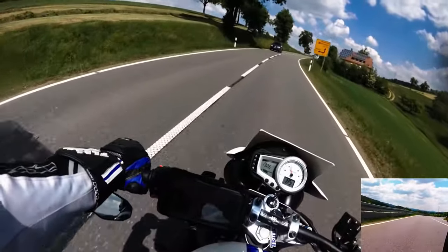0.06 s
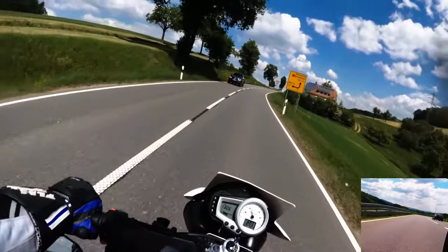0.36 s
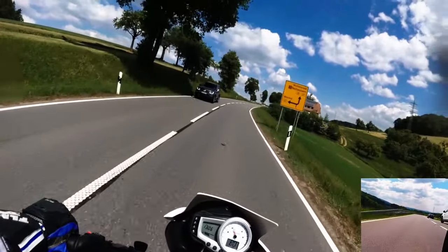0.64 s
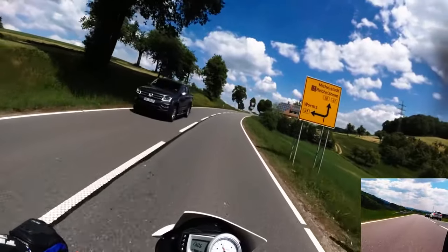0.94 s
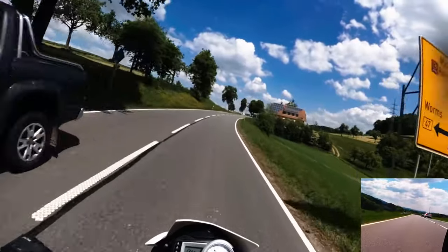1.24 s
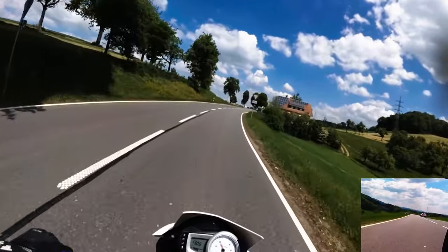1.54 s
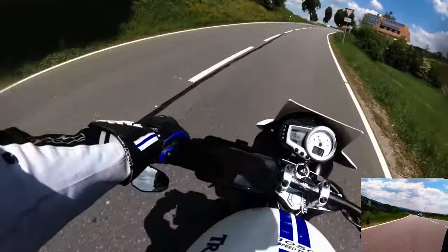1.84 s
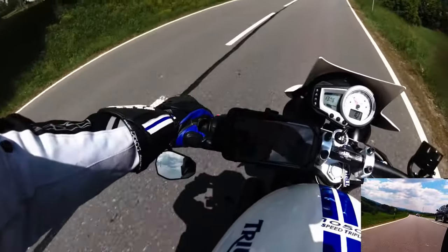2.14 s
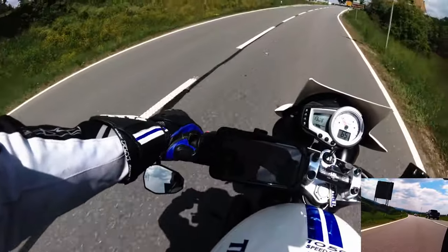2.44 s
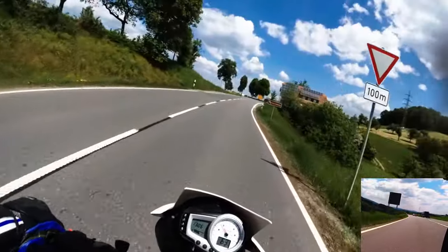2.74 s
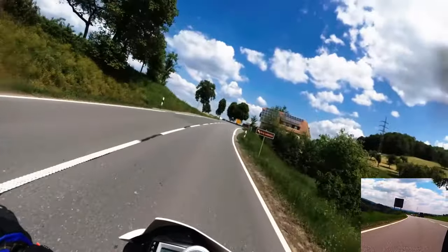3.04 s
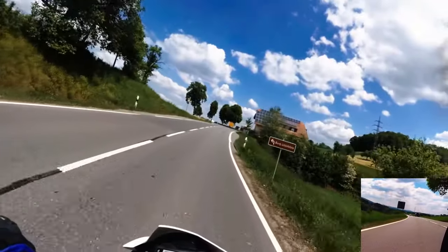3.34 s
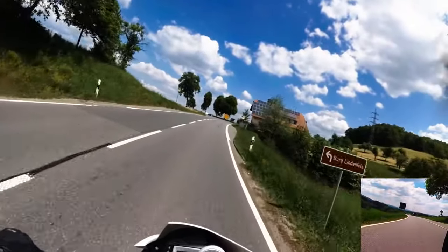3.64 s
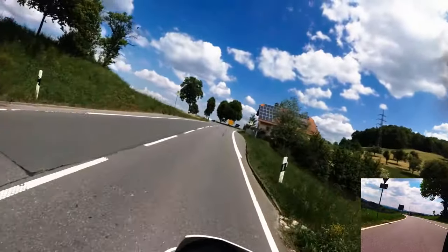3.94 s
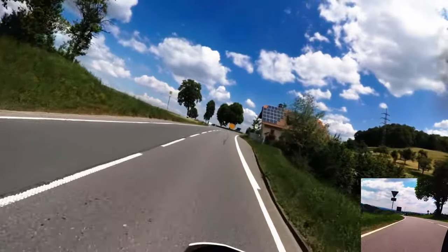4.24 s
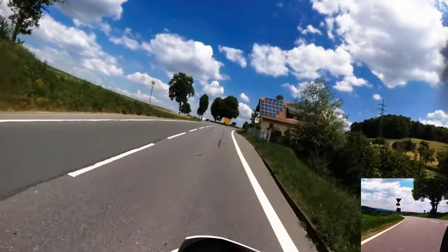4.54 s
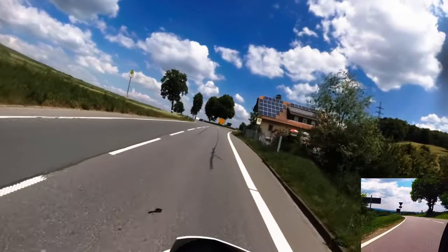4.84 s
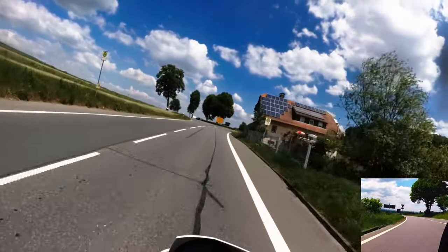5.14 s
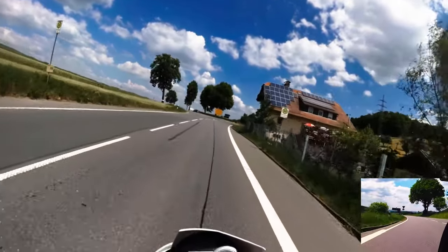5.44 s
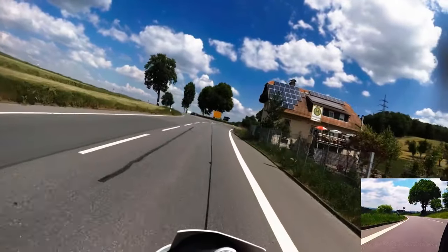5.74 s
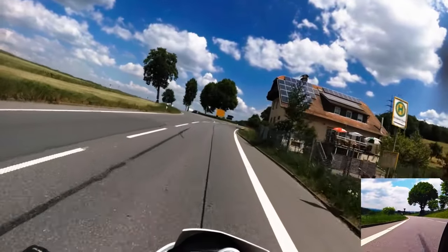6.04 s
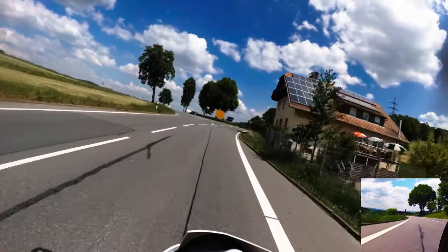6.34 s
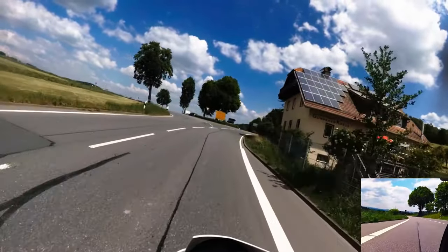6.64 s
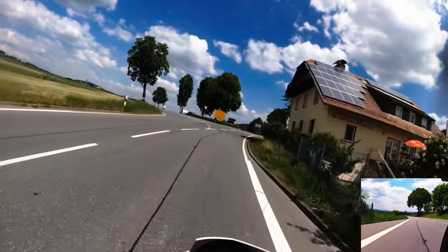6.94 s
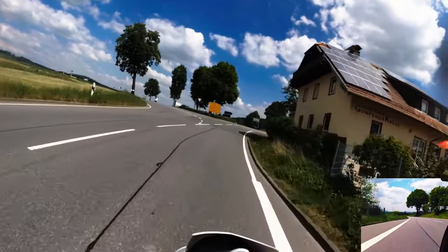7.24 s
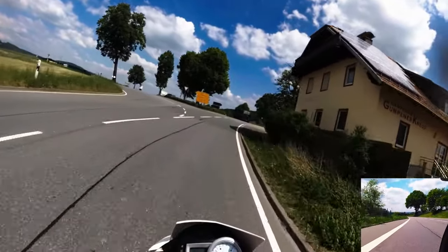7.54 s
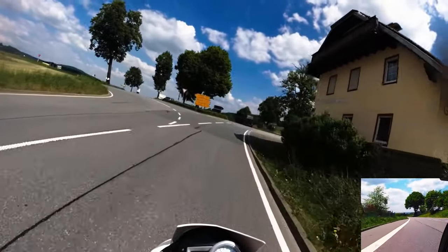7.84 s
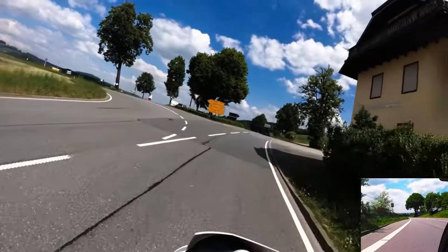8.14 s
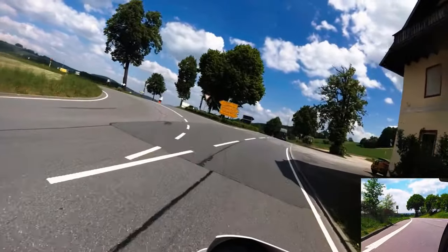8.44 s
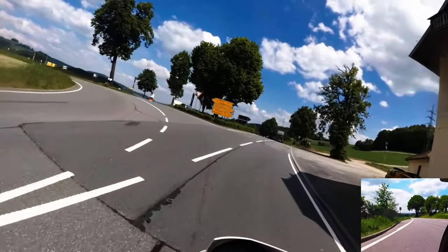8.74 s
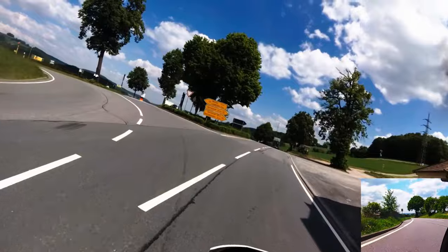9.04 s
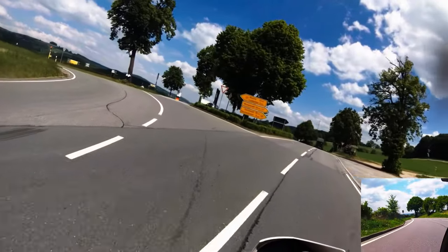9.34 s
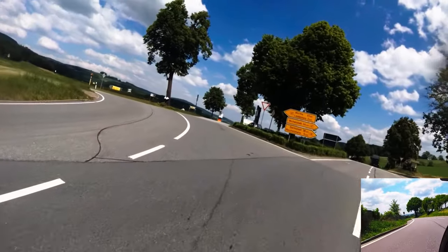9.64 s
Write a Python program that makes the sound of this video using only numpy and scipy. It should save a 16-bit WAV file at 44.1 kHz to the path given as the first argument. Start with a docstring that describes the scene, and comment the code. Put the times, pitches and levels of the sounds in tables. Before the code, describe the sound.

A three-cylinder motorcycle slows on a country road, heard from the rider's helmet with gusty wind rumbling throughout. For the first 3 seconds the engine coasts, its pulsing note sinking along with a gear whine. From about 3.5 to 5.3 seconds it holds a little throttle, and the buffeting eases for a moment. It then coasts again with faint metallic ticking from the drive. Around 6.4 seconds the revs fall away, and at 6.5 a click and a loud, short gearbox knock mark a downshift. The engine idles briefly. Between 7.2 and 7.8 seconds the clutch bites with a soft rush and drags the revs back up. The engine then winds down with a falling gear whine and a light, busy metallic rattle until about 9 seconds, and drops to idle by 9.5.

```python
"""Motorcycle downshift in the wind

A three-cylinder bike on a country road, heard from the rider's helmet through gusty wind. It coasts,
holds a little throttle and coasts again; the clutch is pulled, a lower gear knocks in, and the engine
is dragged back up with whining gears and a rattling drive, then drops to idle. The firings pulse
through the exhaust pipe, make the gears throb and jerk the slack drive."""
import sys
import numpy as np
from scipy import signal
from scipy.fft import rfft, irfft, next_fast_len
from scipy.io import wavfile
from scipy.ndimage import uniform_filter1d, minimum_filter1d, map_coordinates

SR = 44100
rng = np.random.default_rng(int(sys.argv[2]) if len(sys.argv) > 2 else 0)


def generate_wav(signal):
    """Clip the signal to [-1, 1] and save it as 16-bit WAV at the path in sys.argv[1]."""
    frames = np.transpose(np.atleast_2d(signal))
    scaled = np.clip(frames, -1, 1) * 32767
    pcm = np.round(scaled).astype(np.int16)
    wavfile.write(sys.argv[1], SR, pcm)


N = 427325
TIME = np.arange(N) / SR


def amp(db):
    """Decibels to gain."""
    return 10 ** (np.asarray(db) / 20)


def unit(x):
    """Scale to rms 1."""
    return x / np.sqrt(np.mean(x ** 2) + 1e-20)


def curves(rows):
    """One automation curve for each column after the time."""
    times, *columns = np.transpose(rows)
    return [np.interp(TIME, times, column) for column in columns]


def swell(centre_s, half_width_s):
    """A bell-shaped fade in and out."""
    return np.exp(-((TIME - centre_s) / half_width_s) ** 2)


def wobble(rate):
    """Smooth random modulation with `rate` knots a second."""
    knots = rng.standard_normal(int(N * rate / SR) + 4)
    steps = np.arange(0, N * rate / SR + 1, 1 / 8)
    return np.interp(TIME * rate, steps, map_coordinates(knots, [steps]))


def colour(x, points, causal=False):
    """EQ by (Hz, dB) points; a causal filter rings only after each pulse."""
    size = 2 * next_fast_len(N // 2 + 8192)
    hz, db = np.transpose(points)
    gain = amp(np.interp(np.log(np.fft.rfftfreq(size, 1 / SR) + 1), np.log(hz), db))
    if causal:
        cepstrum = irfft(np.log(gain))
        gain = np.exp(rfft(2 * cepstrum[:size // 2], size) - cepstrum[0])
    return irfft(rfft(x, size) * gain, size)[:N]


def noise(points):
    """Coloured noise of rms 1."""
    return unit(colour(rng.standard_normal(N), points))


def resonate(x, hz, width):
    """A resonance applied twice, for steep skirts."""
    b, a = signal.iirpeak(hz, hz / width, SR)
    return signal.lfilter(b, a, signal.lfilter(b, a, x))


def noise_band(hz, width):
    """Resonant noise of rms 1."""
    return unit(resonate(rng.standard_normal(N), hz, width))


def impulses(seconds, sizes):
    """A track with one impulse at each time."""
    return np.bincount(np.clip(np.round(seconds * SR).astype(int), 0, N - 1), sizes, N)


# turbulence on the helmet, with two lulls (time [s], level [dB])
BUFFET_LEVEL = [(0, -19.5), (1, -24), (1.6, -21), (2.6, -23.5), (3.1, -16.5), (3.7, -18.5), (4.05, -33.5),
                (4.8, -35), (5.5, -18.5), (6.4, -18.5), (6.75, -22.5), (7.1, -29.5), (7.5, -22),
                (8.1, -22.5), (9.15, -19), (9.5, -19.5)]
# air streaming past (time [s], relative roar level [dB], unused shell level [dB])
AIRSTREAM = [(0, -22, -47.5), (1.75, -22.5, -39), (2.1, -24, -40.5), (2.6, -26.5, -45), (3.1, -23, -44.5),
             (4.2, -23, -44.5), (5.7, -19.5, -41), (6.4, -29.5, -49), (6.7, -25.5, -42.5),
             (7.4, -24.5, -41), (7.85, -22.5, -37), (8.7, -26, -41), (9.69, -26.5, -47)]
# air at the helmet's edges (time [s], relative level [dB])
HISS_LEVEL = [(0.1, -68), (1.87, -66), (5.68, -63.5), (7.53, -67), (7.64, -60), (7.8, -64), (9.09, -67.5),
              (9.28, -71), (9.6, -69)]
# EQ of the four wind layers, from rumble to sizzle (frequency [Hz], gain [dB])
BUFFET_EQ = [(10, -29), (30, -17.5), (60, -1.5), (110, -3.5), (160, -3.5), (220, -15), (350, -29.5),
             (900, -87)]
ROAR_EQ = [(60, -6), (150, -1), (220, 5), (330, -1), (440, -2.5), (530, -10), (600, -12), (700, -29.5),
           (1200, -38), (5000, -73)]
SHELL_EQ = [(400, 2.5), (650, 1.5), (780, 1), (950, 0), (1080, -5.5), (1250, -17), (2000, -21.5),
            (5000, -47.5)]
HISS_EQ = [(1500, -17), (3000, -9), (4500, 0.5), (6200, 5.5), (7500, 0), (9400, -3.5), (10300, -9),
           (12000, -22), (15500, -36)]


def wind(gust_db=1.1, eddy_db=2, roar_trim_db=-1.7, shell_db=-41, shell_follows=0.37, hiss_trim_db=6):
    """The wind bed: eddies buffet the helmet, roar round it, ring its shell and hiss at its edges."""
    gust = gust_db * wobble(6.5)
    stream_db = curves(AIRSTREAM)[0] + gust
    eddies = unit(wobble(45) + wobble(140))
    buffet = amp(curves(BUFFET_LEVEL)[0] + gust + wobble(9.2)) * noise(BUFFET_EQ)
    roar = amp(stream_db + roar_trim_db + eddy_db * eddies) * noise(ROAR_EQ)
    ring_db = shell_db + shell_follows * (stream_db - stream_db.mean())
    shell = amp(ring_db + eddy_db * unit(eddies + wobble(70))) * noise(SHELL_EQ)
    hiss = amp(curves(HISS_LEVEL)[0] + hiss_trim_db + unit(eddies + wobble(40))) * noise(HISS_EQ)
    return buffet + roar + shell + hiss


# four puffs and two pings (time [s], half-width [s], level [dB], pitch [Hz], filter width [Hz])
PUFFS_AND_PINGS = [(2.33, 0.035, -39.5, 970, 350), (3.793, 0.036, -51, 2900, 2400),
                   (5.895, 0.027, -33, 936, 200), (6.854, 0.005, -38, 1000, 450),
                   (8.566, 0.022, -36.5, 905, 696), (9.491, .008, -41, 1700, 500)]


def puffs_and_pings():
    """Short puffs of air and two brief pings, near 1 kHz and 1.7 kHz."""
    return sum(amp(db) * swell(s, span) * noise_band(hz, width)
               for s, span, db, hz, width in PUFFS_AND_PINGS)


# swells of the panel's ring (time [s], half-width [s], level [dB])
PANEL_SWELLS = [(2.852, 1, -49), (5.888, 0.35, -47), (8.356, 0.47, -47)]


def fairing():
    """Air and vibration set a plastic panel ringing now and then."""
    return sum(amp(db) * swell(s, span) for s, span, db in PANEL_SWELLS) * noise_band(hz=960, width=110)


def clutch(rush_db=-41, ring_db=-47):
    """The slipping clutch rushes as it drags the engine up; a narrow ring swells as it bites."""
    rush = noise([(300, -26), (600, 7), (1000, 4.5), (1300, -16.5), (1700, -7.5), (2300, -18.5),
                  (2900, -13), (4000, -30), (8000, -42.5)])
    ring = noise_band(hz=1630, width=80)
    return amp(rush_db) * swell(7.46, 0.61) * rush + amp(ring_db) * swell(7.63, 0.2) * ring


# body of the gearbox knock (frequency [Hz], relative level [dB], 60 dB decay [s])
KNOCK_MODES = [(454, -1.5, 0.03), (467, -3, 0.035), (337, -25, 0.028), (1750, -22, .02)]
SHIFT_S = 6.534


def downshift(click_db=-41, click_t60_s=0.036, knock_db=-5, lag_s=0.00072, rise_s=0.0034):
    """The shift dogs click, then the gearbox knocks."""
    age = np.maximum(TIME - SHIFT_S, 0)
    snap = noise([(500, -12), (1700, -18), (2700, -18), (4200, 1), (6300, -6), (8000, -10), (12000, -45)])
    click = amp(click_db - 60 * age / click_t60_s) * (age > 0) * snap
    late = np.maximum(age - lag_s, 0)
    knock = sum(amp(db - 60 * late / t60) * np.sin(2 * np.pi * hz * late) for hz, db, t60 in KNOCK_MODES)
    attack = 1 - np.exp(-(late / rise_s) ** 2)
    return click + amp(knock_db) * attack * knock


# spells of engine braking (start [s], end [s], rattle level [dB])
OVERRUN_SPELLS = [(5.502, 6.38, -51), (7.6, 8.85, -47), (8.95, 9.1, -51)]
# the slack drive's hardest ticks (time [s], relative peak [dB], pitch [Hz])
HARD_TICKS = [(5.464, -45, 6400), (5.604, -46, 4450), (5.66, -44, 6300), (5.724, -48, 4350),
              (5.864, -42, 4240), (5.919, -38, 4620), (5.934, -44, 4390), (5.99, -44, 4250),
              (6.033, -39.5, 4070), (6.047, -43, 4350), (6.163, -44, 4350), (6.206, -47, 4120),
              (6.251, -44, 4280), (6.28, -39.5, 4200), (6.341, -41, 4010), (6.373, -45, 6200),
              (6.395, -46, 6400), (7.592, -44, 4080), (7.61, -42, 4150), (7.627, -38, 4300),
              (7.644, -40, 4310), (7.66, -33.5, 4230), (7.675, -38, 4240), (7.704, -42, 4170),
              (7.733, -38, 4060), (7.775, -43, 4110), (7.802, -38, 4420), (7.816, -43, 4250),
              (7.83, -36.5, 4230), (7.844, -43, 6100), (7.858, -42, 4020), (7.871, -44, 4280),
              (7.886, -42, 6100), (7.913, -40, 4080), (7.942, -38.5, 4330), (7.984, -42, 6000),
              (7.998, -38, 4030), (8.012, -41, 4070), (8.026, -44, 4130), (8.054, -34, 4240),
              (8.084, -39, 4200), (8.099, -44, 4040), (8.156, -40, 4030), (8.185, -36, 4280),
              (8.201, -38, 4110), (8.243, -41, 4150), (8.259, -36, 4290), (8.287, -41, 4140),
              (8.303, -41, 6300), (8.363, -38, 4500), (8.378, -35, 4300), (8.408, -41, 4280),
              (8.424, -39, 4320), (8.439, -37, 4300), (8.499, -44, 4210), (8.516, -42, 4360),
              (8.532, -39, 4350), (8.547, -45, 4250), (8.58, -41, 4180), (8.626, -47, 3910),
              (8.655, -42, 3950), (8.688, -46, 4140), (8.708, -44, 4110), (8.772, -43, 4200),
              (8.804, -39, 4130), (8.821, -42, 4030), (8.837, -31.5, 4310), (8.855, -38, 4250),
              (8.991, -36.5, 4300), (9.111, -43, 3730)]
# metallic ring of each tick (frequency [Hz], filter width [Hz], gain [dB])
STEEL_MODES = [(3720, 180, 4), (3975, 310, 5), (4270, 290, 6), (4530, 220, 6), (6190, 820, -1),
               (7800, 2000, -14)]


def rattle(fired, rise_db_per_s=247, fall_db_per_s=73, rebound_s=0.005, rebound_db=-9, tick_trim_db=4,
           contact_s=0.0018, focus_db=7, focus_hz=420):
    """On the overrun the firings jerk the slack drive and it rebounds; each contact scrapes on steel."""
    fired = fired[fired > OVERRUN_SPELLS[0][0]]
    slack = 0
    for start, end, db in OVERRUN_SPELLS:
        fade_in_db = rise_db_per_s * np.maximum(start - fired, 0)
        fade_out_db = fall_db_per_s * np.maximum(fired - end, 0)
        slack += amp(db - fade_in_db - fade_out_db)
    cluster_db = 4.5 * wobble(12)[(fired * SR).astype(int)]
    jerks = slack * amp(cluster_db + rng.standard_normal(len(fired)))
    rebounds = fired + rebound_s * (0.5 + rng.random(len(fired)))
    tick_s, tick_db, tick_hz = np.transpose(HARD_TICKS)
    times = np.concatenate([fired, rebounds, tick_s])[:, None]
    sizes = np.concatenate([jerks, amp(rebound_db) * jerks, amp(tick_db + tick_trim_db)])[:, None]
    pitches = np.concatenate([rng.choice(tick_hz, 2 * len(fired)), tick_hz])[:, None]
    age = np.arange(SR // 50) / SR
    envelope = np.sqrt(age) * np.exp(-age / contact_s)
    rings = 0
    for hz, width, db in STEEL_MODES:
        # a contact favours the modes near its own pitch
        detuning = np.minimum(np.abs(pitches - hz) / focus_hz, 1)
        share = amp(db - focus_db * detuning + 1.5 * rng.standard_normal(times.shape))
        scrapes = envelope * rng.standard_normal((len(times), len(age)))
        rings += share * resonate(scrapes, hz, width)
    rings = sizes * rings / np.abs(rings).max(axis=1, keepdims=True)
    starts = np.round(times * SR) / SR
    return impulses((starts + age).ravel(), rings.ravel())


# high gear, fading as the throttle opens (time [s], level [dB], overtone level [dB])
HIGH_GEAR = [(0, -30, -60), (1.2, -27.5, -56.5), (1.901, -31.5, -50), (2.5, -29.5, -60), (2.9, -34, -65),
             (3.4, -70, -91)]
# low gear, loudest as it drags the engine up (time [s], level [dB], overtone level [dB])
LOW_GEAR = [(6.7, -55, -76), (7.25, -42.5, -55), (7.45, -33.5, -48.5), (7.75, -28.5, -58),
            (8.35, -34.5, -49.5), (8.6, -43, -49), (9.69, -48.5, -70)]


def gear_whine(hz, levels, firings, third_db, throb, waver_db, jitter_rad):
    """The engaged gear pair sings as its teeth mesh; the firings add sidebands."""
    level_db, overtone_db = curves(levels)
    phase = 2 * np.pi * np.cumsum(hz) / SR + jitter_rad * wobble(45)
    overtones = np.sin(2 * phase) + amp(third_db) * np.sin(3 * phase)
    tone = amp(level_db) * np.sin(phase) + amp(overtone_db) * overtones
    pulse = 1 + throb * np.cos(2 * np.pi * firings)
    return np.sqrt(2) * amp(waver_db * wobble(25)) * tone * pulse


# strain on the engine's gears, peaking as the clutch bites (time [s], relative level [dB])
WHIRR_LEVEL = [(0, -52), (1, -59.5), (1.8, -53.5), (4.5, -56), (5.6, -51.5), (6.5, -53.5), (7.2, -50),
               (7.65, -45.5), (7.95, -50), (9.2, -53), (9.69, -50)]
# singing of the meshes, loudest under engine braking (time [s], relative level [dB])
MESH_LEVEL = [(0, -63), (1.2, -61.5), (2.8, -59.5), (3.7, -56.5), (5.3, -55), (6.35, -54), (6.65, -68),
              (7.2, -59), (7.6, -51.5), (8.1, -53), (9.05, -55), (9.35, -53.5), (9.69, -57)]
# the engine's mesh tones (pitch [multiple of the firing rate], relative level [dB])
MESH_TONES = [(22.7, -9), (30.5, 3), (40, 0.5), (60.8, 2)]
# EQ of the valve gear, injectors and casing (frequency [Hz], gain [dB])
WHIRR_EQ = [(600, -23.5), (1200, 5), (1750, 3), (2300, -3.5), (2750, -7.5), (3050, -3.5), (3400, -6),
            (4800, -10), (6000, -21.5), (12000, -56.5)]
INJECTOR_EQ = [(3000, -24.5), (5300, -0.5), (8000, -10.5), (9400, 4), (10500, -1), (11500, -7),
               (13000, -18), (15500, -35.5)]
CASING_EQ = [(500, -30), (1200, -3), (1700, 10), (2200, -6), (2650, 1), (2900, -3), (3100, 0), (3400, 0.5),
             (3800, 0.5), (5000, -17.5), (9000, -37)]


def engine_works(firings, throttle, idling, whirr_trim_db=1, mesh_trim_db=-1.2, injector_db=-68,
                 line_db=-3, waver_db=1.5, throb=0.15):
    """Valve gear whirrs and injectors fizz with the firings; mesh tones sweep the casing's resonances."""
    whirr = amp(curves(WHIRR_LEVEL)[0] + whirr_trim_db) * noise(WHIRR_EQ)
    injectors = amp(injector_db) * (throttle + idling) * noise(INJECTOR_EQ)
    mesh = 0
    for multiple, db in MESH_TONES:  # each a thin line in a fuzzy halo
        halo = np.sin(2 * np.pi * (multiple * firings + 0.35 * wobble(200)))
        line = np.sin(2 * np.pi * (multiple * firings + 0.2 * wobble(25)))
        mesh += amp(db + waver_db * wobble(10)) * (halo + amp(line_db) * line)
    singing = amp(curves(MESH_LEVEL)[0] + mesh_trim_db) * unit(colour(mesh, CASING_EQ))
    pulse = 1 + throb * np.cos(2 * np.pi * firings)
    return pulse * (whirr + injectors + singing)


# grit of the burning charge (frequency [Hz], gain [dB])
RASP_EQ = [(300, -1.5), (480, 13.5), (600, 1.5), (720, -8.5), (900, -2.5), (1250, -21), (1750, -15),
           (2200, -23), (2800, -16), (3050, -13.5), (3500, -28), (8000, -36), (12000, -56.5)]


def rasp(firings, throttle, idling, throttle_db=-39, idle_db=-41, coast_db=-44, lead_cycles=0.17):
    """A puff of noise escapes just ahead of each pulse and dies away, strongest when fuel burns."""
    envelope = np.exp(-2.6 * ((firings + lead_cycles) % 1))
    puffs = unit(colour(envelope * rng.standard_normal(N), RASP_EQ, causal=True))
    coasting = 1 - throttle - idling
    return (amp(throttle_db) * throttle + amp(idle_db) * idling + amp(coast_db) * coasting) * puffs


# resonances of the exhaust pipe (frequency [Hz], gain [dB])
PIPE_EQ = [(15, -56.5), (40, -40), (150, -18.5), (250, -8), (310, -6.5), (460, 1), (545, 6.5), (620, -14.5),
           (720, -18.5), (850, -7), (1050, -17), (1300, -33), (3000, -59.5), (8000, -64.5)]


def chuffs(fired, throttle, idling, coast_db=-42, throttle_boost_db=5, idle_trim_db=-1, evenness=0.88):
    """Uneven firings thump through the pipe, hardest on throttle and most regularly at idle."""
    sizes = evenness * idling[(fired * SR).astype(int)] + rng.standard_normal(len(fired))
    thumps = unit(colour(impulses(fired, sizes), PIPE_EQ, causal=True))
    return -amp(coast_db + throttle_boost_db * throttle + idle_trim_db * idling) * thumps


# blend points of the coasting note (firing rate [Hz])
COAST_RATES = [56, 70.2, 80.3, 85.1, 92.2, 100.6, 108.1]
# harmonic balance of the note (firing order, idle [dB], throttle [dB], coasting at each rate above [dB])
EXHAUST_ORDERS = [(1, -48, -43, [-21.5, -18.5, -24, -17, -19.5, -18, -20.5]),
                  (2, -20.5, -16, [-28, -24, -29.5, -46, -48.5, -31.5, -19]),
                  (3, -25.5, -25, [-29.5, -27.5, -26.5, -25.5, -25.5, -28.5, -40]),
                  (4, -22.5, -38, [-37.5, -37.5, -36.5, -39, -35.5, -29.5, -27.5]),
                  (5, -31, -28, [-43.5, -39.5, -46.5, -35.5, -46, -40, -48]),
                  (6, -35.5, -36.5, [-47.5, -53.5, -50, -49.5, -53, -50, -53.5]),
                  (7, -37.5, -42, [-40, -48.5, -57.5, -67, -60.5, -64, -70]),
                  (8, -40.5, -45.5, [-52, -55, -72, -64, -60, -62, -73])]


def exhaust(hz, firings, throttle, idling, trim_db=0.94, piston_db=-35, lag_hz=480, stumble=0.0051):
    """The lead voice: firing harmonics blend between coasting, idle and throttle over a piston hum."""
    note = amp(piston_db) * (1 - idling) * np.cos(2 * np.pi * 4 / 3 * firings)  # twice the crank speed
    uneven = firings + stumble * (1 - (throttle + idling) / 2) * wobble(70)
    coasting = 1 - throttle - idling
    for order, idle_db, throttle_db, db_by_rate in EXHAUST_ORDERS:
        coast_db = np.interp(hz, COAST_RATES, db_by_rate)
        gain = amp(coast_db) * coasting + amp(idle_db) * idling + amp(throttle_db) * throttle
        pipe_lag = (order * hz / lag_hz) ** 2  # the pipe delays the higher orders
        # throttle flips each pulse from a suck to a push
        phase = 2 * np.pi * order * uneven - pipe_lag + np.pi * throttle
        flutter_db = 0.18 * order * (1 - idling / 2) * wobble(40)
        note -= gain * amp(trim_db + flutter_db) * np.cos(phase)
    return np.sqrt(2) * note


# the revs (time [s], firing rate [Hz])
FIRING_RATE = [(0, 111.4), (1.83, 92.9), (2.44, 87.3), (3.05, 82.2), (3.4, 79.9), (4.1, 77.5), (4.88, 76.6),
               (5.35, 75.3), (5.7, 72.5), (6.1, 69.7), (6.3, 67.5), (6.41, 58), (6.62, 41.1), (6.73, 35.9),
               (6.91, 34.3), (7.17, 36.4), (7.42, 46), (7.56, 53.3), (7.68, 66.9), (7.8, 72.9),
               (8.25, 67.8), (8.9, 59.2), (9.05, 58.4), (9.17, 50.9), (9.27, 42.9), (9.5, 34.1),
               (9.69, 33.5)]
# the rider opens the throttle a little (time [s], blend [0-1])
THROTTLE_BLEND = [(3, 0.08), (3.4, 0.06), (3.9, 0.92), (5.3, 1), (5.45, 0.01)]
# the clutch is pulled and the engine idles (time [s], blend [0-1])
IDLE_BLEND = [(6.45, 0), (6.68, 0.93), (7.3, 0.9), (7.55, 0.07), (9.18, 0), (9.45, 0.98)]


def scene():
    """The mono mix at the helmet: engine and drive over the wind bed."""
    hz, = curves(FIRING_RATE)
    firings = np.cumsum(hz) / SR  # running count
    fired = np.flatnonzero(np.diff(np.floor(firings))) / SR  # time of each firing [s]
    throttle, idling = np.clip(curves(THROTTLE_BLEND) + curves(IDLE_BLEND), 0, 1)
    engine = exhaust(hz, firings, throttle, idling) + chuffs(fired, throttle, idling)
    engine += rasp(firings, throttle, idling) + engine_works(firings, throttle, idling)
    high_hz = 4.42 * hz  # 4.42 teeth mesh per firing
    low_hz = 640 - 89 * (TIME - SHIFT_S)  # glides down as the bike slows
    high = gear_whine(high_hz, HIGH_GEAR, firings, third_db=-21, throb=0.3, waver_db=3, jitter_rad=0.74)
    low = gear_whine(low_hz, LOW_GEAR, firings, third_db=-9, throb=0.11, waver_db=2, jitter_rad=0.45)
    drive = high + low + downshift() + clutch() + rattle(fired)
    return (engine + drive + fairing() + wind() + puffs_and_pings())[None]


def record(dry, ceiling_db=-8.5, release_db_per_s=110, top_hz=15800):
    """A limiter catches each peak and lets go over several firings; a steep low-pass trims the top."""
    release_db = release_db_per_s * TIME
    over_db = np.maximum(20 * np.log10(np.abs(dry[0]) + 1e-9) - ceiling_db, 0)
    held_db = np.maximum.accumulate(over_db + release_db) - release_db
    gain = uniform_filter1d(minimum_filter1d(amp(-held_db), size=130), size=190)
    fade = np.minimum(1, np.arange(N) / 100)
    low_pass = signal.butter(20, top_hz, fs=SR, output="sos")
    return signal.sosfilt(low_pass, dry * gain * fade * fade[::-1])


dry = scene()
out = record(dry)
generate_wav(out)
```